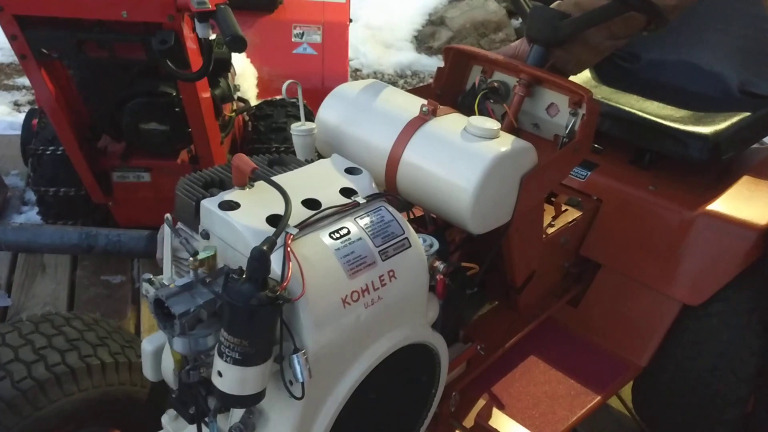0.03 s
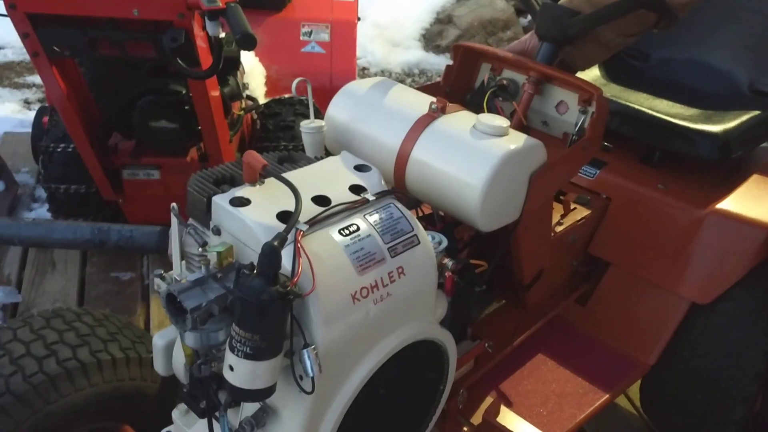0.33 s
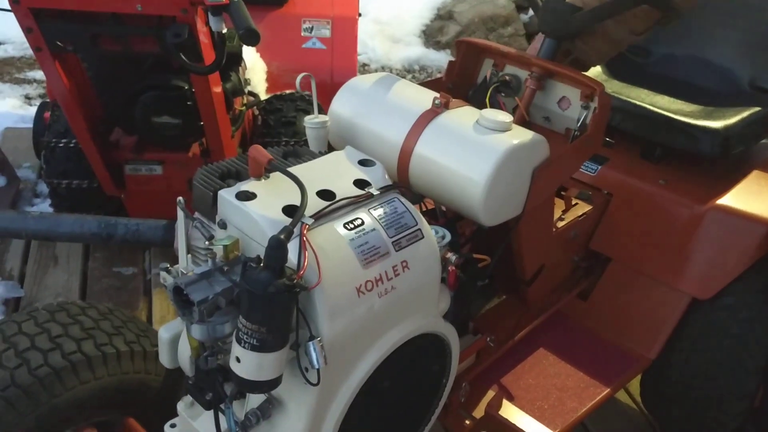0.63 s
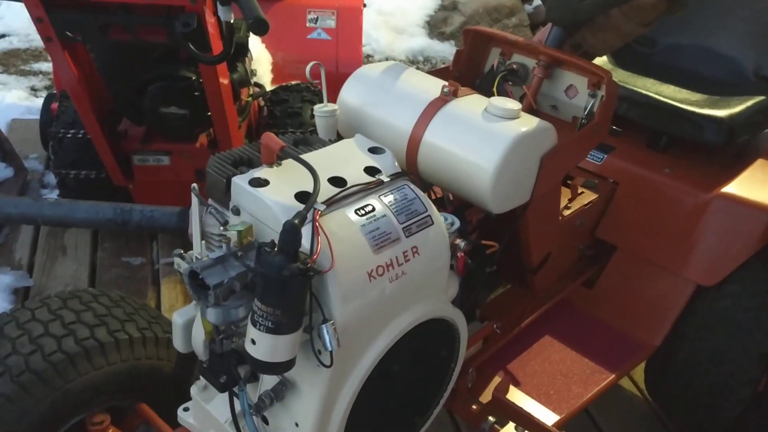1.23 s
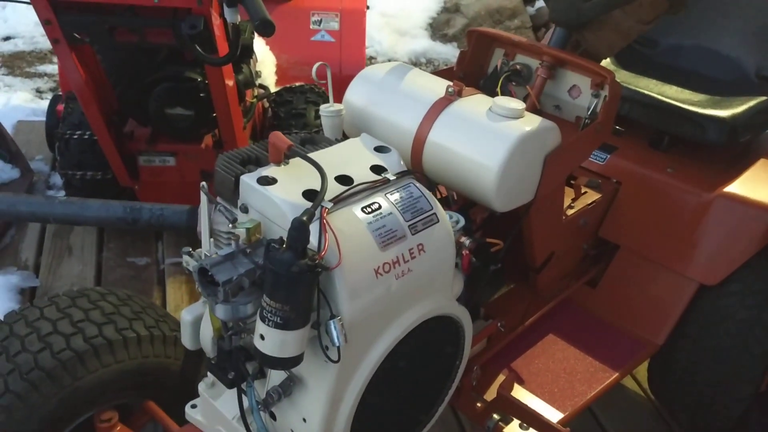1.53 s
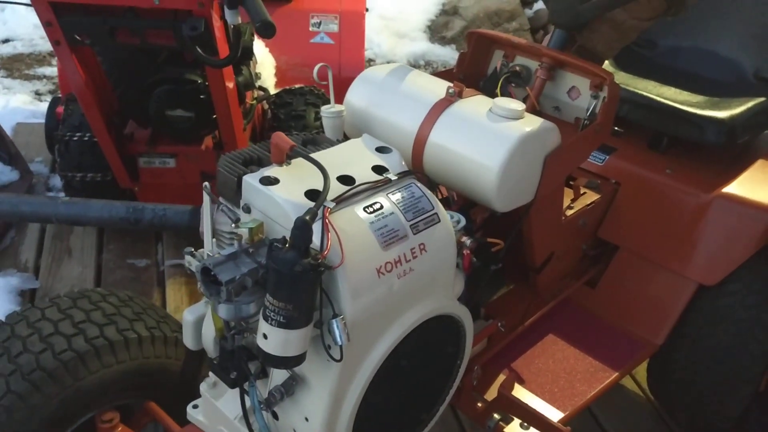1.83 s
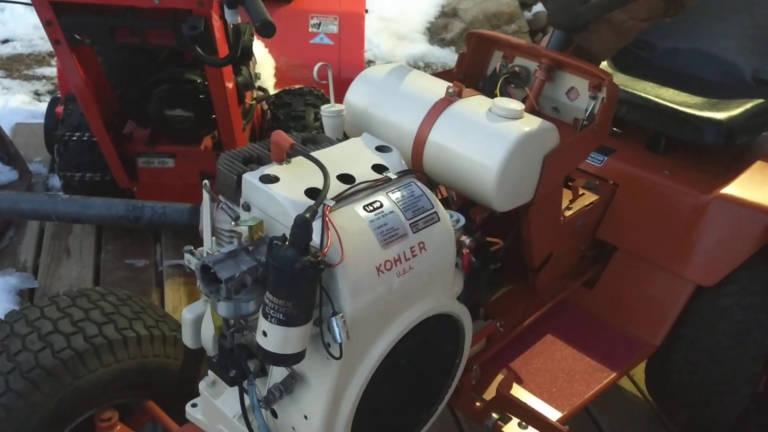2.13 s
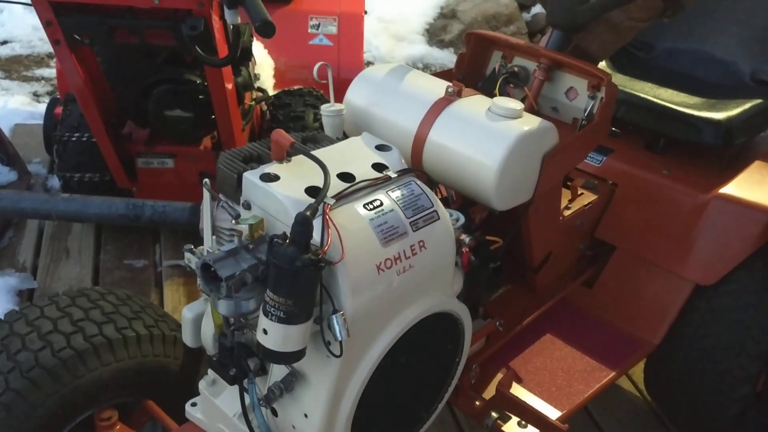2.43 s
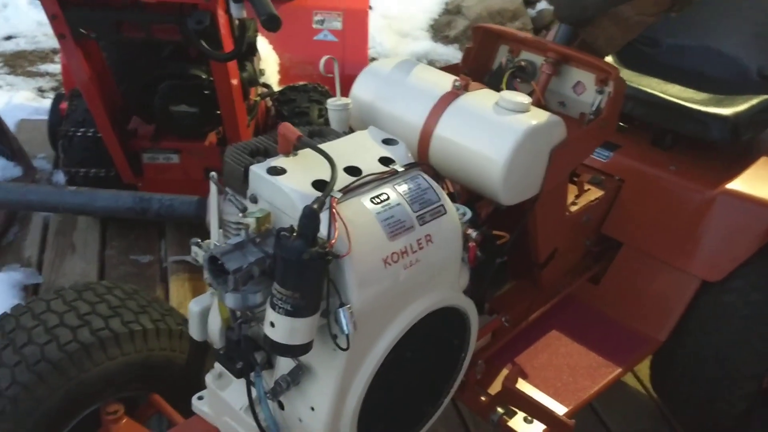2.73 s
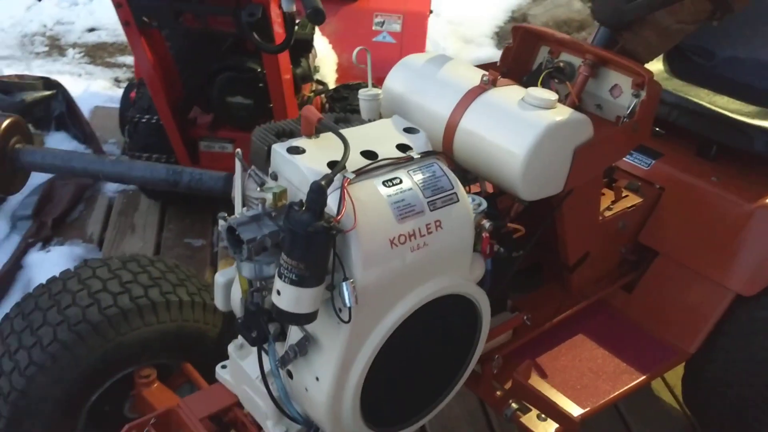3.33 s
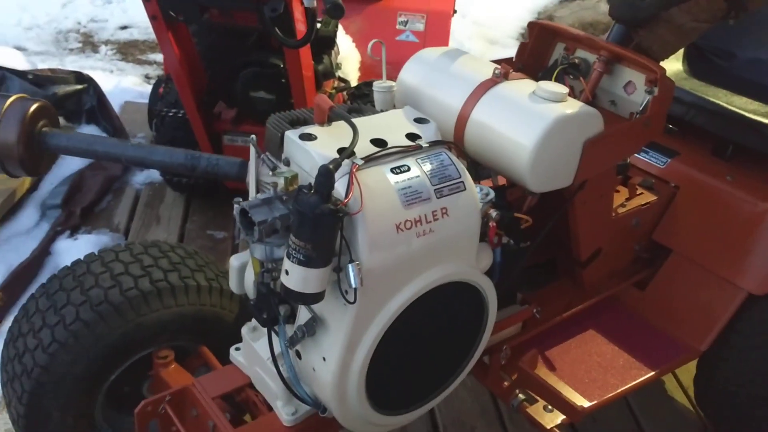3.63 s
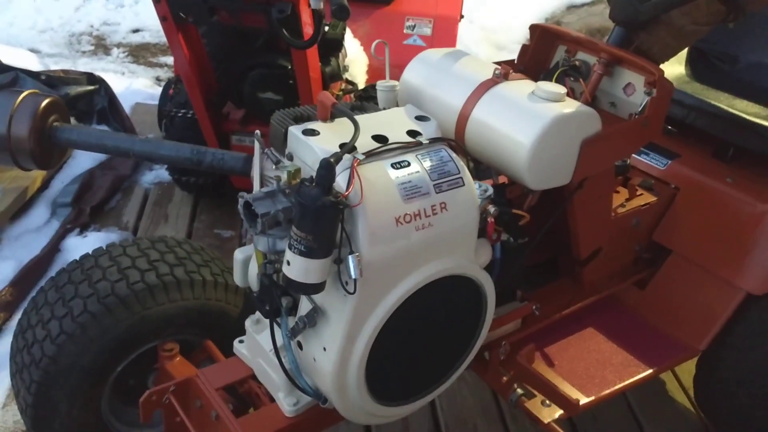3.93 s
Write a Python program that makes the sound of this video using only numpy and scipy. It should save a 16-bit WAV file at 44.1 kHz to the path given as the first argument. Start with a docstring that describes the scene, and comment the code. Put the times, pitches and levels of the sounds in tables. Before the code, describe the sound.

A small tractor engine is cranked near the microphone in quiet open air. Faint cloth rustling, control clicks and a soft metal boom come first, followed by a sudden crack and loud, whining starter clatter with rhythmic gulps of air.

```python
"""A single-cylinder garden tractor is cranked by its electric starter, outdoors and close by.
Over quiet air a sleeve rustles and controls click; the second lever sets the sheet-metal deck booming.
A brief squeak follows, and the starter switch snaps over. At 2.92 s the pinion slams into the flywheel,
and its tooth impacts, quickening with the shaft, clatter and whine through the shroud's resonances.
From 3.2 s the engine gulps air and puffs it out once in every cycle."""
import sys
import numpy as np
from scipy import signal
from scipy.fft import rfft, irfft
from scipy.io import wavfile
from scipy.ndimage import uniform_filter1d

SR = 44100
rng = np.random.default_rng(int(sys.argv[2]) if len(sys.argv) > 2 else 0)


def wav_record(signal):
    """Record a signal, one row per channel, as 16-bit PCM in the file named by sys.argv[1]."""
    frames = np.transpose(np.atleast_2d(signal))
    bounded = np.clip(frames, -1, 1)
    # unit amplitude maps onto the largest positive 16-bit level
    quanta = np.round(bounded * 32767).astype(np.int16)
    wavfile.write(sys.argv[1], SR, quanta)


N = 176400
T, HZ = np.arange(N) / SR, np.fft.rfftfreq(N, 1 / SR)
TEETH, START_S = 10, 2.922

# starter shaft (time [s], speed [turns/s])
SHAFT_SPEED = [(2.92, 22.5), (3.05, 45.7), (3.16, 57), (3.25, 66), (3.44, 84.5), (3.53, 79.5), (3.63, 81),
               (3.73, 84), (3.8, 74), (3.9, 82.5), (4.0, 85.7)]
# shroud and flywheel resonances (frequency [Hz], bandwidth [Hz], level [dB])
SHROUD_MODES = [(360, 36, -3.5), (501, 26, -2.5), (566, 32, -7), (672, 28, -4.5), (752, 30, -4),
                (849, 30, 0), (925, 30, 0), (1053, 26, -2), (1252, 22, 0), (1370, 28, 1), (1545, 70, 2),
                (1748, 22, -3), (2358, 45, -4), (2976, 30, -6), (3050, 40, -7)]
# balance of the starter (frequency [Hz], left minus right [dB])
STARTER_BALANCE = [(60, -3), (110, -9), (200, 1), (380, -3.5), (700, -2.5), (1500, 3.5), (2380, -1),
                   (5000, -1), (15000, 0.5)]


def amp(db):
    """Decibels to amplitude ratio."""
    return 10 ** (np.asarray(db) / 20)


def unit(x, span=slice(None)):
    """Normalisation to rms 1 over a span of samples."""
    return x / np.sqrt(np.mean(x[..., span] ** 2) + 1e-20)


def read(points):
    """Interpolation of a table over log frequency, at every bin."""
    hz, value = np.transpose(points)
    return np.interp(np.log(HZ + 1), np.log(hz + 1), value)


def shape(x, gain):
    """Filtering by multiplication of the spectrum."""
    return irfft(rfft(x) * gain, N)


def band(lo_hz, hi_hz, order=8):
    """Band-pass magnitude response with soft edges."""
    return ((1 + (lo_hz / (HZ + 1)) ** order) * (1 + (HZ / hi_hz) ** order)) ** -.5


def resonance(hz, width):
    """Frequency response of a damped oscillator."""
    return 1j * HZ * width / (hz ** 2 - HZ ** 2 + 1j * HZ * width)


def noise():
    """Two uncorrelated white noises."""
    return rng.standard_normal((2, N))


def flutter(rate_hz):
    """Low-pass random modulation with rms 1."""
    return unit(shape(rng.standard_normal(N), band(1, rate_hz)))


def place(pair, correlation=None):
    """Mid-side mixing gives two unrelated signals a set left-right correlation."""
    # near sources (frequency [Hz], correlation [-1 to 1])
    near_correlation = [(60, 0), (200, .7), (600, 0.94), (1300, 1), (2400, 0.26), (15000, 0.7)]
    a, b = rfft(pair)
    c = np.clip(read(correlation or near_correlation), -.99, .99)
    mid, side = a * np.sqrt((1 + c) / 2), b * np.sqrt((1 - c) / 2)
    return irfft(np.array([mid + side, mid - side]), N)


def lean(x):
    """A level difference between the sides positions each band of the starter."""
    return shape(x, amp(read(STARTER_BALANCE) * np.array([[.5], [-.5]])))


def strike(s, rise, t60):
    """Impact envelope: linear rise, exponential decay."""
    return np.clip((T - s) / rise, 0, 1) * amp(-60 * np.clip((T - s - rise) / t60, 0, 4))


def arch(s, length):
    """Half-sine envelope."""
    return np.sin(np.pi * np.clip((T - s) / length, 0, 1))


def ring(hits, modes):
    """Modal superposition: impulses (time [s], level [dB]) excite damped sinusoids."""
    blows, t = np.zeros(N), T[:SR // 2]
    for s, db in hits:
        blows[int(s * SR)] += amp(db)
    response = sum(amp(db - 60 * t / t60) * np.sin(2 * np.pi * hz * t) for hz, db, t60 in modes)
    return signal.fftconvolve(blows, response)[:N]


def linger(power, seconds):
    """Leaky integration: each burst of energy decays exponentially."""
    r = np.exp(-1 / (seconds * SR))
    return signal.lfilter([1 - r], [1, -r], power + 1e-12)


def patchy(x, depth_db, width_hz, seconds):
    """Random gain over time and frequency: no two teeth ring alike."""
    hz, t, spectra = signal.stft(x, SR, nperseg=512, noverlap=384)
    field = rng.standard_normal(spectra.shape[1:])
    field = uniform_filter1d(field, max(1, round(width_hz / hz[1])), 0)
    field = uniform_filter1d(field, max(1, round(seconds / t[1])), 1)
    gain = amp(depth_db * np.minimum(unit(field), 2))
    y = signal.istft(spectra * gain, SR, nperseg=512, noverlap=384)[1][:, :N]
    return y * np.std(x) / np.std(y)


def hush():
    """Ambient noise: broadband outdoor air and a faint, narrowband far drone."""
    # air (frequency [Hz], spectrum level [dB])
    air_spectrum = [(30, -32), (53, -27), (81, 2.5), (164, 2.5), (299, -3.5), (1260, -12.5), (2100, -15),
                    (2360, -12.5), (3230, -16.5), (8500, -24), (15500, -17.5)]
    # left against right (frequency [Hz], correlation [-1 to 1])
    air_correlation = [(60, -0.83), (130, -0.94), (300, -0.46), (640, 0.56), (1400, 1), (3000, 0.78),
                       (15000, 0.74)]
    air = unit(shape(place(noise(), air_correlation), amp(read(air_spectrum))))
    drone = unit(shape(rng.standard_normal(N), resonance(hz=97, width=19) ** 2))
    return amp(-56.5) * air + amp(-79.5) * drone


def sleeve():
    """Friction of cloth and hand makes swells of grainy noise."""
    # rubs (time [s], duration [s], level [dB], tilt [dB/octave])
    rubs = [(0.23, 0.065, -51.5, -4.5), (0.293, 0.075, -58, -2.5), (0.606, 0.16, -60.5, -6),
            (0.926, 0.11, -56, 0), (1.907, 0.28, -52, 2.5), (2.625, 0.18, -56, -0.5),
            (2.689, 0.031, -45.5, -12.5)]
    # friction noise (frequency [Hz], level [dB])
    rub_spectrum = [(100, -32), (500, -3.5), (1200, 8.5), (3200, 6.5), (6000, 5), (9000, -11), (15000, -4)]
    grains = place(noise() * amp(5 * rng.standard_normal(N)))
    colour, octaves = read(rub_spectrum), np.log2((HZ + 300) / 2000)
    return sum(amp(db) * arch(s, length) * unit(shape(grains, amp(colour + tilt * octaves)))
               for s, length, db, tilt in rubs)


def ticks(hiss):
    """Brief contacts have broad spectra: small ticks and rebounds are bright noise bursts."""
    # contacts (time [s], relative level [dB])
    contacts = [(0.3327, -35), (0.499, -35), (0.7977, -20), (0.8065, -28), (1.3872, -15.5), (1.5523, -34.5),
                (1.9173, -29.5), (2.1271, -30.5), (2.23, -36), (2.3107, -35), (2.5214, -26.5),
                (2.8265, -29), (2.8888, -31), (2.9477, -6.5), (3.062, -20)]
    # tick noise (frequency [Hz], level [dB])
    tick_spectrum = [(100, -11), (1000, -28), (3000, 1.5), (5500, 6.5), (9000, 0.5), (14000, 8.5),
                     (16000, 6.5)]
    envelope = sum(amp(db - 10.5) * strike(s, rise=.0006, t60=.026) for s, db in contacts)
    return envelope * unit(shape(hiss, amp(read(tick_spectrum))))


def knocks():
    """Dull impacts excite the low modes of the frame."""
    # impacts (time [s], level [dB])
    impacts = [(0.616, -51), (1.9645, -36), (2.659, -52), (2.743, -46.5), (2.95, -31)]
    # frame (frequency [Hz], level [dB], t60 [s])
    frame_modes = [(176, -11, 0.23), (240, -2.5, 0.03), (348, 4.5, 0.017), (584, -14, 0.047),
                   (970, -4, 0.017)]
    return shape(ring(impacts, frame_modes), band(174, 5000))


def clacks(hiss):
    """Impacts of levers, switch and pinion: a noise transient and the free vibration of the levers."""
    # impacts (time [s], rise [s], t60 [s], five band levels [dB], ring level [dB])
    impacts = [(0.7944, 0.0016, 0.1, -66, -54.5, -45.5, -40.5, -58, -36.5),
               (1.387, 0.0037, 0.098, -45, -35, -44.5, -39.5, -30.5, -35),
               (2.8191, 0.00059, 0.034, -55, -35, -32.5, -46, -29.5, -62),
               (2.848, 0.00056, 0.025, -47, -40, -44, -47, -43, -64),
               (2.9105, 0.0046, 0.12, -58, -54, -44, -42, -34, -52),
               (2.9216, 0.0004, 0.061, -55, -23, -27, -39, -40, -50)]
    # the five bands (nominal frequency [Hz])
    band_hz = [400, 1200, 2700, 5500, 13000]
    # levers (frequency [Hz], level [dB], t60 [s])
    lever_modes = [(1294, -11.5, 0.24), (2900, -11, 0.13), (5700, -0.5, 0.07), (12140, -3, 0.022)]
    edges = np.sqrt(np.array([100] + band_hz) * np.array(band_hz + [SR]))
    bands = [unit(shape(hiss, band(lo, hi))) for lo, hi in zip(edges, edges[1:])]
    bursts = sum(strike(s, rise, t60) * sum(amp(db) * part for db, part in zip(levels, bands))
                 for s, rise, t60, *levels, _ in impacts)
    ringing = ring([(s, db) for s, *_, db in impacts], lever_modes)
    chatter = amp(2.5 * np.minimum(flutter(rate_hz=400), 1))  # loose parts rattle as they ring
    return (bursts + ringing) * chatter


def deck():
    """The dense modes of the sheet-metal deck merge into a decaying band of noise."""
    boom = unit(shape(place(noise()), abs(resonance(hz=390, width=170)) ** 2))
    return amp(-51) * strike(1.395, rise=.018, t60=.65) * boom


def squeak():
    """A short tone burst, heard as a high squeak."""
    return amp(-48) * arch(2.677, length=.011) * np.sin(2 * np.pi * 5900 * T)


def switch():
    """The starter switch snaps over and leaves its housing in damped vibration."""
    # snaps (time [s], level [dB])
    snaps = [(2.8187, -31), (2.8485, -35)]
    # housing (frequency [Hz], level [dB], t60 [s])
    housing_modes = [(845, 0, 0.022), (1077, -4, 0.025)]
    return ring(snaps, housing_modes)


def controls():
    """Direct sound of the controls plus diffuse reflections from the machinery around."""
    hiss, echo_t60 = place(noise()), .3
    direct = ticks(hiss) + knocks() + clacks(hiss) + squeak() + switch()
    tail = rng.standard_normal((2, SR // 2)) * amp(-60 * T[:SR // 2] / echo_t60)
    tail /= np.linalg.norm(tail[0])
    echo = signal.fftconvolve(shape(direct, band(150, 3800, order=2)), tail, axes=1)[:, :N]
    return (direct + amp(-6) * echo) * amp([[-1], [1]])


def engagement():
    """The pinion strikes the flywheel: an impact of a few milliseconds gives a broadband crack."""
    # crack (frequency [Hz], level [dB])
    crack_spectrum = [(100, -14), (1000, -6), (4000, -7), (9000, -10), (12000, -3), (14500, 3), (15800, -1),
                      (17000, -30)]
    slam_s, width_s = 2.9229, .0009
    envelope = np.exp(-abs(T - slam_s) / width_s)
    crack = envelope * np.tanh(unit(shape(place(noise()), amp(read(crack_spectrum)))))
    return amp(-2.5) * signal.sosfilt(signal.butter(2, 250, "high", fs=SR, output="sos"), crack)


def tooth_blows(speed, jitter_s, spread_db, wobble_db):
    """An uneven impulse train, one blow a tooth, amplitude-modulated at the shaft's rotation rate."""
    turns = np.cumsum(speed * (T > START_S - .01)) / SR
    at = np.flatnonzero(np.diff(np.floor(turns * TEETH)) > 0)
    late, size = rng.standard_normal((len(at), 2)).T
    level_db = spread_db * np.minimum(size, 1) + wobble_db * np.sin(2 * np.pi * turns[at])
    blows = np.zeros(N)
    blows[np.clip(at + (late * jitter_s * SR).astype(int), 0, N - 1)] = amp(level_db)
    return blows


def starter():
    """Impact excitation: tooth blows ring the shroud; their scrape and echo give rattle and treble."""
    # relative levels of cranking (time [s], clatter [dB], rattle [dB], treble [dB])
    crank_levels = [(2.93, -31, -36, -44), (2.938, -22.5, -18, -39), (2.95, -20.5, -25.5, -25.5),
                    (2.974, -23, -34, -34), (3.0, -25.5, -28, -41), (3.05, -26.5, -23.5, -34.5),
                    (3.3, -24, -22.5, -29), (3.47, -26, -26.5, -26.5), (3.758, -24.5, -25.5, -30),
                    (3.798, -25.5, -21.5, -23), (3.824, -25, -25, -36), (3.844, -23, -25, -29),
                    (3.99, -24.5, -24, -27.5)]
    # gear noise (frequency [Hz], spectrum level [dB])
    gear_spectrum = [(59, -64), (100, -15.5), (184, -19.5), (223, -20.5), (275, -22.5), (362, -12.5),
                     (447, -23), (487, -15), (825, -8.5), (1110, -10), (1520, -9.5), (2180, -1.5),
                     (2990, -3.5), (4370, -8), (5400, -12.5), (7250, -18.5), (8770, -20), (9740, -19),
                     (10800, -27), (13900, -14.5), (15500, -29.5)]
    # thin ringing of the pinion (frequency [Hz], bandwidth [Hz], level [dB])
    pinion_modes = [(3484, 36, 0), (5307, 63, 0.5), (6800, 790, 6.5), (12540, 460, -3)]
    times, *levels = np.transpose(crank_levels)
    clatter_gain, rattle_gain, treble_gain = [amp(np.interp(T, times, db)) for db in levels]
    colour, speed = amp(read(gear_spectrum)), np.interp(T, *np.transpose(SHAFT_SPEED))
    full_turns_per_s, rise_s = 75, .0065

    def filtered(x, gain):
        """Filtering, normalised to rms 1 while the starter runs."""
        return unit(shape(x, gain), span=T > START_S)

    def response(modes):
        """Summed resonance curves, with broad modes weighted down."""
        return sum(amp(db) * abs(resonance(hz, width)) ** 2 / np.sqrt(width) for hz, width, db in modes)

    blows = tooth_blows(speed, jitter_s=.00035, spread_db=3.5, wobble_db=2.5)
    contact = linger(blows ** 2, seconds=.0006) + linger(blows ** 2, seconds=.006)
    scrape = unit(place(np.sqrt(contact) * noise()))
    scrape = patchy(scrape, depth_db=3.1, width_hz=260, seconds=.014)
    drive = unit(place(np.array([blows, blows * rng.standard_normal(N)])))
    drive = patchy(drive, depth_db=2.6, width_hz=90, seconds=.11)

    shroud = filtered(drive, response(SHROUD_MODES))
    gears = filtered(amp(1.5) * drive + scrape, colour * band(155, 2180))
    clatter = clatter_gain * (amp(-2) * shroud + amp(-3.5) * gears)
    thinness = np.clip(.5 * (1 - speed / full_turns_per_s), 0, .6)
    clatter -= thinness * shape(clatter, band(400, 720))  # the body fills in as the motor gains speed
    pinion = filtered(scrape, response(pinion_modes))
    rattle = filtered(scrape, colour * band(1120, 3720)) + amp(-9) * pinion
    treble = filtered(scrape, colour * band(5800, SR))
    treble = amp(2.5) * filtered(np.tanh(treble / 2), HZ > 4500)  # no single tooth stands far out
    onset = np.clip((T - START_S) / rise_s, 0, 1)
    return onset * lean(clatter + rattle_gain * rattle + treble_gain * treble)


def whine():
    """Forced vibration: the gear-mesh tone peaks at shroud resonances; at times the shroud sings out."""
    # brief tones of the shroud (time [s], duration [s], frequency [Hz], level [dB])
    shroud_tones = [(2.96, 0.12, 350, -36), (3.21, 0.15, 1245, -28), (3.81, 0.055, 1053, -27),
                    (3.85, 0.05, 1525, -24), (3.85, 0.05, 1748, -28)]
    waver_rad, waver_hz = .7, 40
    mesh_hz = TEETH * np.interp(T, *np.transpose(SHAFT_SPEED))
    phase = 2 * np.pi * np.cumsum(mesh_hz) / SR + waver_rad * flutter(waver_hz)
    tone = np.sin(phase) * (mesh_hz / mesh_hz[-1]) ** 2 * (T > START_S)
    shroud = sum(amp(db) * abs(resonance(hz, width)) ** 2 for hz, width, db in SHROUD_MODES)
    out = amp(-35) * shape(tone, shroud)
    for s, length, hz, db in shroud_tones:
        out += amp(db) * arch(s, length) * np.sin(2 * np.pi * hz * T + waver_rad * flutter(waver_hz))
    return lean(out)


def intake():
    """Each intake stroke excites a damped resonance of the inlet."""
    # gulps of air (time [s], level [dB])
    gulps = [(3.238, -30), (3.5, -36), (3.529, -27), (3.758, -40), (3.787, -27.5)]
    inlet_hz = 229.8
    out = sum(amp(db) * strike(s, rise=.0081, t60=.22) * np.sin(2 * np.pi * inlet_hz * (T - s))
              for s, db in gulps)
    return out * amp([[-1], [1]])


def exhaust():
    """Each exhaust stroke radiates a soft, low-frequency pressure pulse."""
    # puffs of air (time [s], level [dB])
    puffs = [(3.315, -51), (3.589, -52.5), (3.85, -52)]
    puff_hz = 79.5
    out = sum(amp(db) * arch(s, length=.058) * np.sin(2 * np.pi * puff_hz * (T - s)) for s, db in puffs)
    return out * np.array([[1.5], [.4]])


def scene():
    """Linear superposition of all sources."""
    cranking = starter() + whine() + engagement() + intake() + exhaust()
    return cranking + controls() + deck() + sleeve() + hush()


def record(dry):
    """Interference: the stereo microphone delays the left treble, so bands alternate middle and side."""
    lag_s, lag_above_hz, cutoff_hz = .0004535, 1102, 15800
    half_phase = np.pi * lag_s * np.maximum(HZ - lag_above_hz, 0)
    left, right = shape(dry[0], np.exp(-2j * half_phase)), dry[1]
    mid_notches = .79 * np.sin(half_phase) ** 12
    side_notches = .64 * np.cos(half_phase) ** 8 * (HZ > lag_above_hz)
    mid = shape((left + right) / 2, np.sqrt(1 - mid_notches))
    side = shape((left - right) / 2, np.sqrt(1 - side_notches))
    fade_in = np.clip((T - .072) / .29, 0, 1) ** .37
    lowpass = signal.firwin(301, cutoff_hz, window=("kaiser", 9), fs=SR)
    return signal.oaconvolve(fade_in * np.array([mid + side, mid - side]), lowpass[None], "same")


dry = scene()
out = record(dry)
wav_record(out)
```